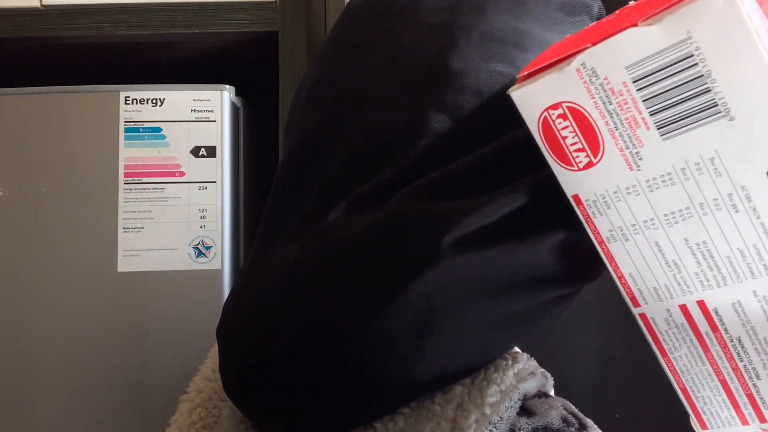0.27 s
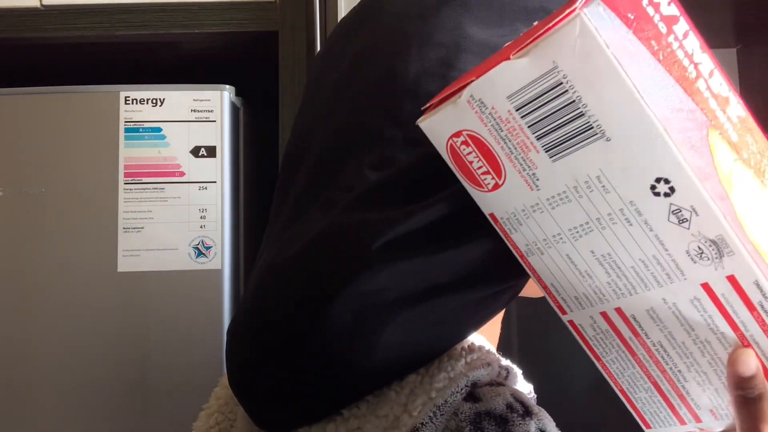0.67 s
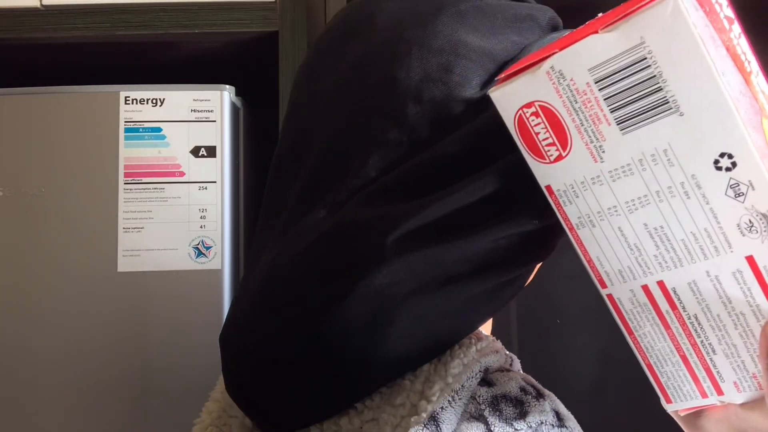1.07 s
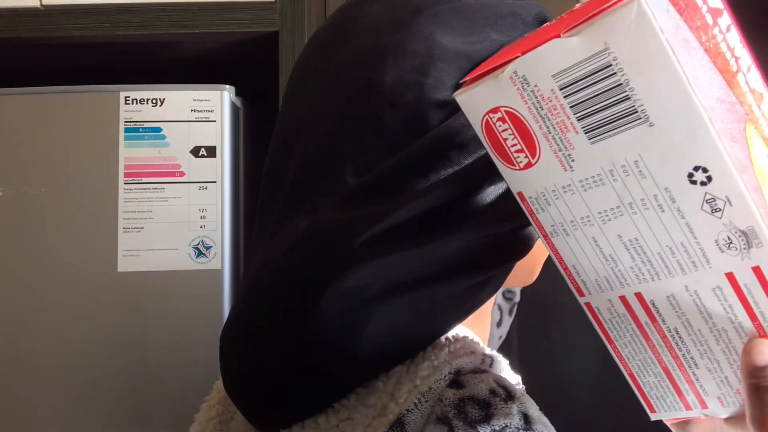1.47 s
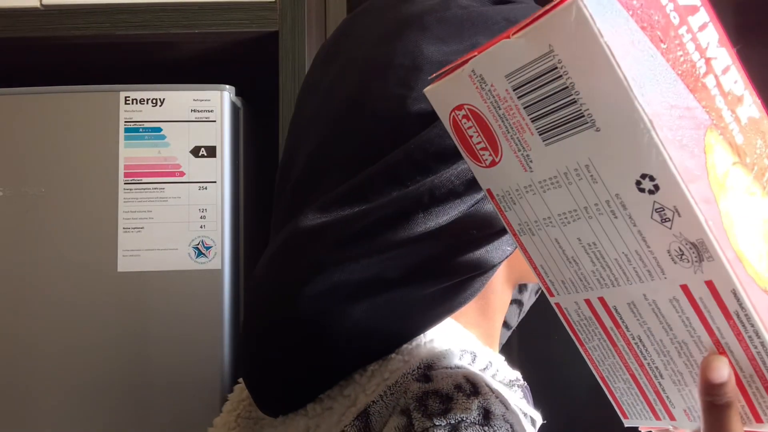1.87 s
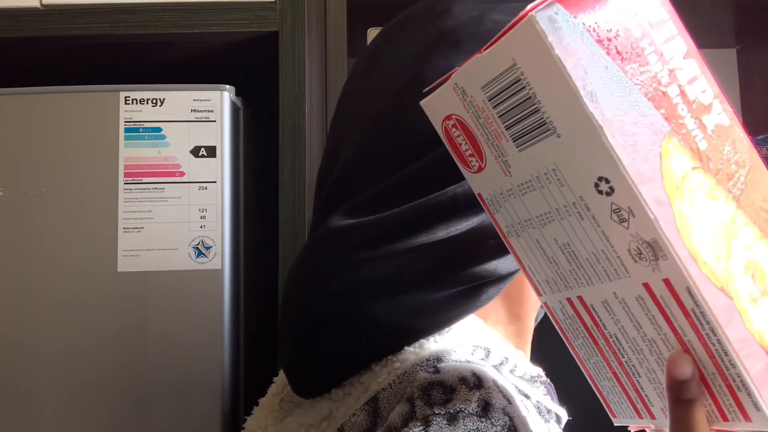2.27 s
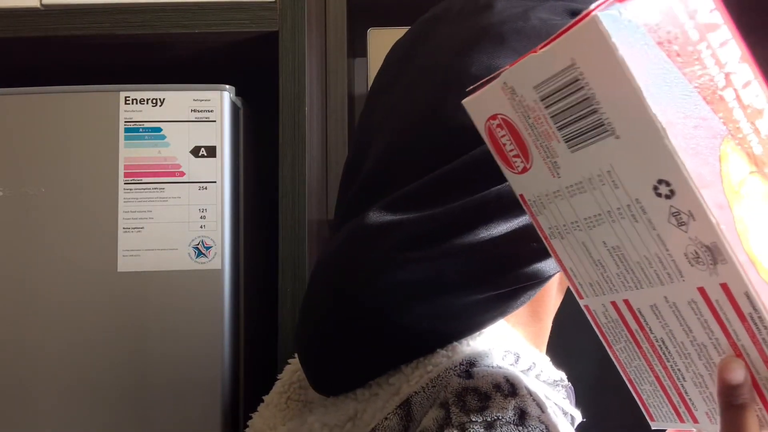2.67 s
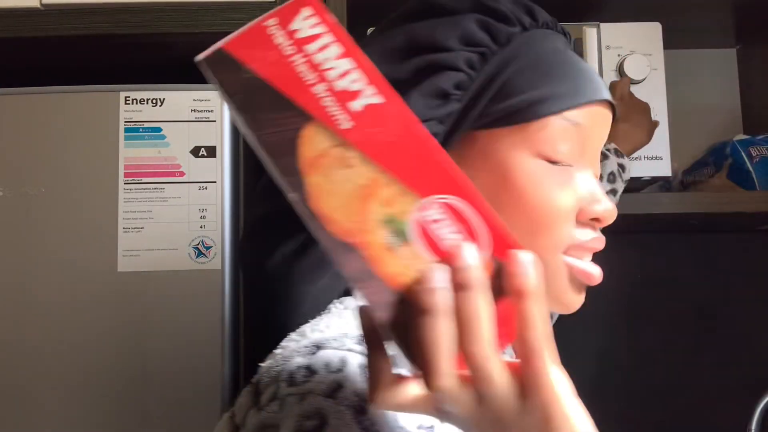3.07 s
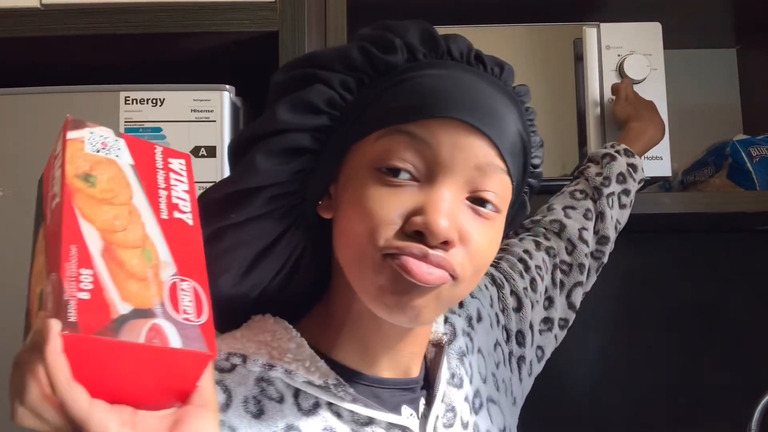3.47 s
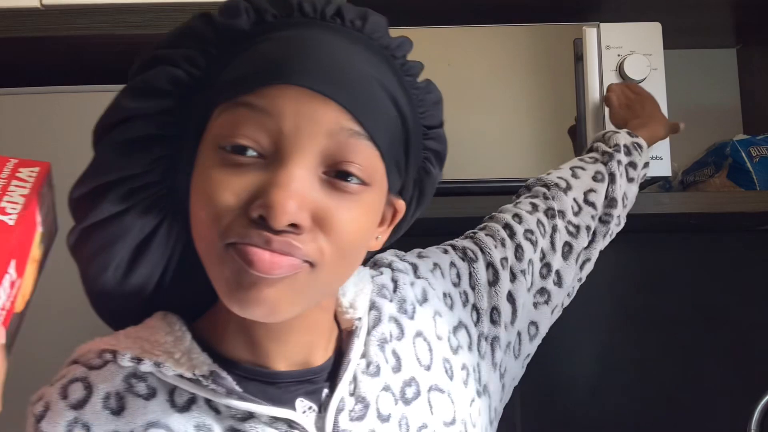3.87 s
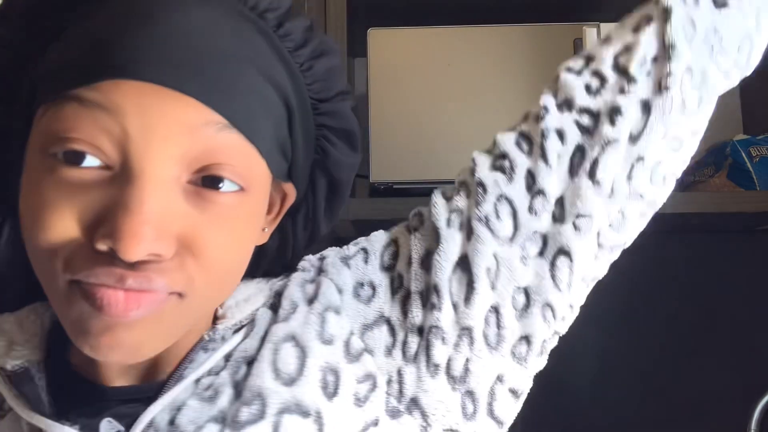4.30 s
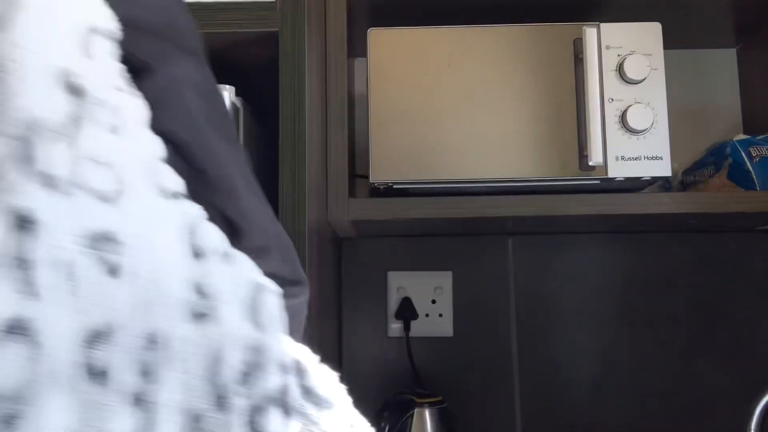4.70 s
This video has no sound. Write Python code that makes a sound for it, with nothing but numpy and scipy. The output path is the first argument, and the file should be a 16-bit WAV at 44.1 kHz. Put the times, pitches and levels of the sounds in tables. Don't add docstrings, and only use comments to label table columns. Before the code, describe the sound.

A hollow microwave door rattles open and slams with a boomy thud, a dial clicks, then a steady low mains hum starts.

```python
import sys
import numpy as np
from scipy import signal
from scipy.fft import rfft, irfft, next_fast_len
from scipy.io import wavfile
from scipy.ndimage import uniform_filter1d

SR = 44100
rng = np.random.default_rng(int(sys.argv[2]) if len(sys.argv) > 2 else 0)


def pcm_store(signal):
    levels = np.round(np.clip(np.atleast_2d(signal), -1, 1) * 32767)
    wavfile.write(sys.argv[1], SR, levels.astype(np.int16).T)


def volts(x):
    e = np.asarray(x, float) / 20
    return 10 ** e


N = 217986
T = np.arange(N) / SR

# (multiple of the mains [1], level [dB], left-right [dB], left lead [rad])
HUM_ORDERS = [(1, -23, 5, -.1), (2, 0, -4, -.1), (3, -26.5, 7.5, -1.1), (4, -22.5, -0.5, 0.2),
              (6, -19.5, -7, -1.26)]
MAINS_HZ, RELAY_S, LOAD_S = 50.05, 2.405, 3.6
HUM_DB, HUM_WAVER_DB, INRUSH_DB, INRUSH_S = -35.5, .7, 9.5, 0.047
BUZZ_DB, BUZZ_DROP_DB = 4.5, 13.5

# (start [s], top [dB], rise [s], hold [s], fall [dB/s])
JOLTS = [
    (2.4, -17, .055, 0.029, 436),
    (2.5, -34, 0.044, 0.036, 151),
]
SHUDDERS = [
    (1.66, -37, 0.015, 0.021, 150),
    (1.71, -19, 0.055, 0.054, 190),
    (1.9, -27.5, 0.035, .005, 171),
    (2.0, -38, 0.032, 0.035, 60),
]
# (frequency [Hz], level [dB])
CASING_MODES = [(145, -1.6), (183, -1.8)]
JOLT_HZ = 141.3

# (start [s], top [dB], rise [s], hold [s], fall [dB/s])
TURNING = [
    (3.349, -44.5, .15, 0.17, 60),
    (3.85, -58, 0.088, .15, 25),
]
TURNTABLE_HZ, TURNTABLE_CREEP_HZ_PER_S = 178.8, 4

FAN_LAG_S, RUSH_DB, BLADE_HZ, BLADE_DB = .7, -48, 212, -41.5
BLADE_WAKE_S, BLADE_WAKE_SPAN_S = 4.11, .2

# (time [s], rattle level [dB], window plate level [dB], panel level [dB])
CATCHES = [
    (0.367, -32.5, -17, -25.5),
    (0.439, -34, -25, -27.5),
    (0.474, -46, -34, -25),
    (0.499, -35, -22, -29),
    (.525, -44.5, -46, -24),
    (0.602, -57, -38.5, -41),
]
# (frequency [Hz], width [Hz], level [dB])
FITTINGS = [(1050, 57, 1.5), (1304, 69, 2.5), (1680, 150, 8), (2165, 410, -1.5), (2995, 70, 5),
            (3380, 100, -1), (4540, 230, -26)]
# (frequency [Hz], width [Hz], level [dB])
PANEL = [(219, 58, 1), (348.7, 8.9, -1), (420, 19.4, 5.5), (550, 22, 1.5), (532, 22, 4.5), (642, 28, -0.5)]
# (frequency [Hz], width [Hz])
PLATE = (786, 40)
# (frequency [Hz], level [dB])
RATTLE = [(300, 6), (900, -8), (2500, 11), (4500, -22), (7000, -7), (12000, 2.5), (16000, 4.5)]
CATCH_RISE_S, RATTLE_FALL, PLATE_FALL, PANEL_FALL = 0.0061, 890, 400, 310

# (time [s], level [dB], brightness [dB/octave], ring frequency [Hz], ring level [dB])
CONTACTS = [
    (6.4, [(.368, -20, 7.5, 2150, -4), (.433, -27.5, 4.5, 1680, -11), (.51, -32.5, -22, 3120, -13), (.699, -28.5, -10, 2980, -23)]),
    (6.5, [(.915, -41, 3, 870, 3), (.926, -32, 1, 590, -25), (.96, -34.5, .5, 920, -9)]),
    (10.5, [(1.655, -27, 3, 1380, -0.5), (1.665, -25.5, 1.5, 747, -21), (1.684, -26.5, 2.5, 730, 6), (1.702, -17, 0.5, 1110, -3)]),
    (13.5, [(1.71, -14, 4, 1130, -7), (1.719, -13, 0.5, 2215, -4), (1.735, -29, -1, 940, 2)]),
    (7.5, [(2.129, -36.5, -0.5, 1035, 7), (2.142, -44, -2, 2000, -9), (2.168, -40, -4.5, 2010, -4), (2.202, -41.5, -4, 1050, 4), (4.283, -43.5, -0.5, 2120, -4)]),
    (6.1, [(2.401, -35.5, -2.5, 843, 9.5), (2.408, -42.5, 0.5, 737, 7.5), (2.439, -41, 0, 1050, 5.5), (2.48, -55, -2.5, 836, -2.5)]),
]
# (frequency [Hz], level [dB])
CRACK = [(60, -2), (200, 8), (500, 1), (1200, -8), (2500, -10.5), (4500, -17.5), (7000, -29),
         (12000, -23.5), (16000, -30.5)]
CONTACT_RISE_S = 0.0014

# (time [s], push, out positive [1])
BLOWS = [
    (1.727, -1.5),
    (1.744, -0.59),
    (1.753, 0.16),
    (1.758, -1.1),
    (1.776, -1.75),
    (1.804, 0.14),
    (1.945, .3),
]
# (frequency [Hz], level [dB], decay time t60 [s])
CABINET = [(50.7, -1.5, 0.34), (79.5, -1, 0.15), (96.2, -10, 0.72), (215.4, -8.5, 0.49),
           (254.8, -2.5, 0.44), (291, -11, 0.71), (336, -10, 0.12), (382.5, -0.5, 0.27), (458, -12, 0.92),
           (600, 3.5, 0.24)]
BLOW_MS, BLOW_DB, CABINET_DB = 1.86, -19.5, -21.5

# (time [s], level [dB])
TICKS = [
    (2.1298, -62),
    (2.135, -70),
    (2.141, -70),
    (3.27, -71),
    (4.283, -62.5),
    (4.9413, -45),
    (3.997, -56),
    (3.9992, -49.5),
]

# (start [s], top [dB], rise [s], hold [s], fall [dB/s])
SLEEVE = [
    (3.02, -70, 0.071, .2, 118),
    (3.74, -77.5, .07, 0.0087, 171),
    (4.12, -79, 0.12, 0.018, 96),
    (4.265, -67.5, 0.043, 0.022, 109.5),
    (4.38, -73.5, 0.045, 0.071, 128.5),
    (4.7, -80, 0.077, .01, 62),
]
RUB_DB = 11

# (order of the compressor cycle [1], level [dB], left-right [dB], left lead [rad])
FRIDGE_ORDERS = [(3.72, -52.5, -5, -1.2), (7.64, -49, 0.5, 0.1), (27, -59.5, 16.5, 0.6),
                 (27.95, -48.5, -3, 0.4), (29.1, -50, 6, 2.5), (28.8, -55.5, -6.5, -0.9)]
CYCLE_HZ, CYCLE_PEAK_S = 15.23, 2.415

# (frequency [Hz], level [dB])
AIR = [(30, -26), (45, 1), (120, -3), (250, -7.5), (500, -10.5), (1100, -13.5), (1500, -19), (3000, -26),
       (6000, -38), (12000, -58), (14900, -49.5), (15400, -66)]
# (frequency [Hz], width [Hz], level [dB])
ROOM_MODES = [(106.5, 2.2, -50.5), (145.6, 2.7, -60.5), (182, 1.1, -52), (213.8, 3.4, -56.5),
              (295.6, 22, -61), (359, 10, -59.5), (619.3, 6.2, -61), (1058.5, 21, -64)]
AIR_DB = -45.5

# (frequency [Hz], decay time t60 [s])
KITCHEN = [(60, 0.72), (150, 0.48), (500, 0.63), (1500, 0.64), (3000, 0.61), (6000, 0.55), (11000, .33),
           (16000, 0.24)]
RING_WALLS_DB = -5

# (frequency [Hz], level [dB])
PORT_SUM = [(28, -24.5), (45, -0.5), (600, 1), (6500, -2), (7800, -9), (8500, -23.5), (9600, -18),
            (10500, -10), (12500, -7.5), (15800, -9), (16300, -43)]
# (frequency [Hz], level [dB])
PORT_DIFF = [(28, -48), (45, -25), (130, -9.5), (290, -4), (640, 2.5), (1400, 3.5), (3100, -1.5),
             (7000, -0.5), (11000, -3.5), (12500, -18.5), (14000, -25), (16300, -42.5)]
# (frequency [Hz], left-right [dB])
TILT = [(60, -6), (110, 3), (200, 1.5), (380, -1), (700, -2.5), (1290, -1.5), (2380, -2.5), (4400, -0.5),
        (8120, 0.5), (15000, 1)]
LAG_SHARE = .3


def mains_hum():
    since = np.clip(T - RELAY_S, 0, 9)
    inrush_db = INRUSH_DB * np.exp(-(since / INRUSH_S) ** 2)
    level = np.minimum(since / 0.011, 1) * volts(HUM_DB + inrush_db + HUM_WAVER_DB * drift(4.5))
    buzz_db = BUZZ_DB - BUZZ_DROP_DB / (1 + np.exp((LOAD_S - T) / 0.042))
    orders = sum(tone(round(k) * MAINS_HZ * T, db + buzz_db * (k > 5), tilt, lead)
                 for k, db, tilt, lead in HUM_ORDERS)
    return orders * level


def casing():
    jolt = tone(JOLT_HZ * (T - 2.4505), 0, -1.5, -0.69)
    jolt = jolt + tone(CASING_MODES[1][0] * T, -16, 0, .3)
    shudder = -sum(tone(hz * (T - 1.7775), db, .5, 0.81) for hz, db in CASING_MODES)
    return jolt * swells(JOLTS) + shudder * swells(SHUDDERS)


def fan_speed():
    return 1 - np.exp(-np.clip(T - RELAY_S, 0, 9) / FAN_LAG_S)


def fan_blades():
    awake = 1 / (1 + np.exp((BLADE_WAKE_S - T) / BLADE_WAKE_SPAN_S))
    turns = np.cumsum(BLADE_HZ * (.86 + .14 * fan_speed())) / SR
    return tone(turns, BLADE_DB + 1.3 * drift(20), 0, -0.39) * awake


def turntable():
    motor_hz = TURNTABLE_HZ + TURNTABLE_CREEP_HZ_PER_S * (T - TURNING[0][0])
    return tone(np.cumsum(motor_hz) / SR, 2.5 * drift(25), 3.8, .2) * swells(TURNING)


def microwave():
    return mains_hum() + casing() + fan_blades() + turntable()


def catching(column, fall):
    return swells([(row[0], row[column], CATCH_RISE_S, .012, fall) for row in CATCHES])


def modes(drive, part):
    return evened(sum(volts(db) * evened(resonate(drive, hz, width)) for hz, width, db in part))


def swing():
    strength = volts(3.2 * np.minimum(rng.exponential(1, N), 3))
    slips = (rng.random(N) < 500 / SR) * strength * rng.choice([-1., 1.], N)
    drive = evened(slips) + 0.34 * rng.standard_normal(N)
    rattle = modes(drive, FITTINGS) + volts(-3.0) * evened(shade(drive, RATTLE))
    panel = modes(drive, PANEL)
    plate = evened(resonate(resonate(rng.standard_normal(N), *PLATE), *PLATE))
    plate /= np.sqrt(uniform_filter1d(plate ** 2, size=1500)) + 0.36
    body = plate * catching(column=2, fall=PLATE_FALL) + panel * catching(column=3, fall=PANEL_FALL)
    return rattle * catching(column=1, fall=RATTLE_FALL), body


def knocks():
    cracks, rings, clicks = np.zeros((3, N))
    t = np.arange(4096) / SR
    hz = np.fft.rfftfreq(len(t), 1 / SR)
    hits = [(ms, *row) for ms, rows in CONTACTS for row in rows]
    for ms, s, db, bright_db, ring_hz, ring_db in hits:
        noise = rng.standard_normal(len(t))
        colour = volts(read(CRACK, hz) + bright_db * np.log2((hz + 50) / 1000))
        rise = volts(db) * np.minimum(t / CONTACT_RISE_S, 1)
        crack = rise * evened(irfft(rfft(noise) * colour)) * np.exp(-1000 * t / ms)
        click = irfft(colour * np.exp(-2j * np.pi * hz * ms / 2000))
        click_gain = np.linalg.norm(crack) / np.linalg.norm(click)
        ring = volts(ring_db) * np.sin(2 * np.pi * ring_hz * t) * np.exp(-t / .007)
        add(cracks, s, crack)
        add(clicks, s, click * click_gain * (t < .05))
        add(rings, s, rise * ring)
    return cracks, rings, clicks


def blows():
    push = np.zeros(N)
    for s, force in BLOWS:
        add(push, s - BLOW_MS / 1000, force * np.hanning(round(2 * BLOW_MS / 1000 * SR)))
    t = np.arange(SR) / SR
    ring = sum(volts(db - 60 * t / t60) * np.sin(2 * np.pi * hz * t) for hz, db, t60 in CABINET)
    thin = signal.lfilter(*signal.butter(2, 110, "high", fs=SR), push)
    return volts(BLOW_DB) * thin, volts(CABINET_DB) * signal.fftconvolve(push, ring)[:N] / 100


def ticks():
    out = np.zeros(N)
    for s, db in TICKS:
        add(out, s, volts(db + 9.5) * rng.standard_normal(40) * np.hanning(40))
    return shade(out, [(2000, -38), (6000, -4), (12000, 2.0)])


def sleeve():
    fibres = rng.standard_normal((2, N)) * volts(2.0 * rng.exponential(1, (2, N)))
    hiss = evened(shade(fibres, [(7000, -21), (10500, -1), (12500, -6.5), (14300, 2), (16000, -1)]))
    rub = evened(shade(fibres, [(600, -32), (2000, 7.5), (5000, -1.5), (7500, -1), (9500, -40)]))
    return (volts(12.0) * hiss + volts(RUB_DB) * rub) * swells(SLEEVE)


def refrigerator():
    turns = CYCLE_HZ * (T - CYCLE_PEAK_S)
    return sum(tone(round(k) * turns + 0.0053 * drift(8), db + 0.16 * drift(4.1), tilt, lead)
               for k, db, tilt, lead in FRIDGE_ORDERS)


def air():
    noise = rng.standard_normal((2, N))
    rush = volts(RUSH_DB) * fan_speed() ** 3
    wash = evened(shade(noise, AIR)) * np.sqrt(volts(AIR_DB) ** 2 + rush ** 2)
    boom = sum(volts(db) * evened(resonate(noise, hz, width)) for hz, width, db in ROOM_MODES)
    return (wash + boom) * volts(0.69 * drift(23.5))


def kitchen(x, count=4):
    taps = np.zeros((2 * count, SR))
    at = np.arange(200, SR - 20, 20) + rng.integers(0, 20, (2 * count, (SR - 201) // 20))
    np.put_along_axis(taps, at, rng.choice([-1., 1.], at.shape), 1)
    hz, t, z = signal.stft(taps, SR, nperseg=512)
    tails = signal.istft(z * volts(-60 * t / read(KITCHEN, hz)[:, None]), SR, nperseg=512)[1]
    shares = np.cos(np.pi * (T / .024 - np.arange(2 * count)[:, None] // 2 / count)) ** 2
    shares /= np.sqrt((shares[::2] ** 2).sum(axis=0))
    wet = signal.fftconvolve(x * shares, tails / np.linalg.norm(tails[0]), axes=1)[:, :N]
    return wet.reshape(count, 2, N).sum(axis=0)


def ports(field):
    late = signal.hilbert(field[0], next_fast_len(N))[:N].imag
    both = shade(field[0], PORT_SUM)
    between = shade(LAG_SHARE * late + np.sqrt(1 - LAG_SHARE ** 2) * field[1], PORT_DIFF)
    left = shade(both + between, [(hz, db / 2) for hz, db in TILT])
    right = shade(both - between, [(hz, -db / 2) for hz, db in TILT])
    return np.array([left, right])


def tone(turns, db, tilt_db, lead):
    half = np.array([[.5], [-.5]])
    return np.sqrt(2) * volts(db + half * tilt_db) * np.cos(2 * np.pi * turns + half * lead)


def swell(s, db, rise, hold, fall):
    attack = np.sin(np.pi / 2 * np.clip((T - s) / max(rise, 1e-3), 0, 1)) ** 2
    return attack * volts(db - fall * np.clip(T - s - rise - hold, 0, 9))


def swells(rows):
    return np.sqrt(sum(swell(*row) ** 2 for row in rows))


def drift(rate):
    wander = rng.standard_normal(N)
    for _ in range(2):
        wander = signal.lfilter([1], [1, -np.exp(-rate / SR)], wander)
    return evened(wander)


def resonate(x, hz, width):
    pole = np.exp((2j * np.pi * hz - np.pi * width) / SR)
    return 2 * signal.lfilter([1 - abs(pole)], [1, -pole], x).real


def shade(x, points):
    size = next_fast_len(N)
    return irfft(rfft(x, size) * volts(read(points, np.fft.rfftfreq(size, 1 / SR))), size)[..., :N]


def read(points, hz):
    f, value = np.transpose(points)
    return np.interp(np.log(hz + 1), np.log(f + 1), value)


def evened(x):
    return x / np.sqrt(np.mean(x ** 2) + 1e-20)


def add(mix, s, sound):
    part = mix[round(s * SR):][:len(sound)]
    part += sound[:len(part)]


def scene():
    push, cabinet = blows()
    rattle, body = swing()
    cracks, rings, clicks = knocks()
    direct = rattle + cracks + body + volts(9.0) * push + cabinet + rings + ticks()
    direct = direct * [[1], [-.5]]
    to_walls = volts(2.5) * (rattle + clicks) + volts(-5.0) * (body + push + cabinet)
    walls = kitchen(to_walls + volts(RING_WALLS_DB) * rings)
    return ports(direct + walls + air() + sleeve()) + refrigerator() + microwave()


def top_cut(x):
    return signal.sosfilt(signal.butter(12, 15850, fs=SR, output="sos"), x)


def record(dry):
    soft = np.tanh(dry / 1.192) * 1.242
    return top_cut(soft)


dry = scene()
out = record(dry)
pcm_store(out)
```